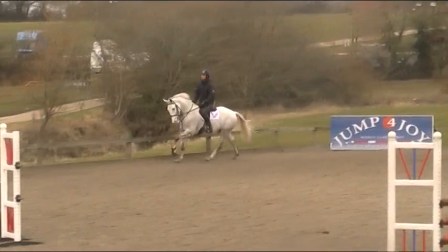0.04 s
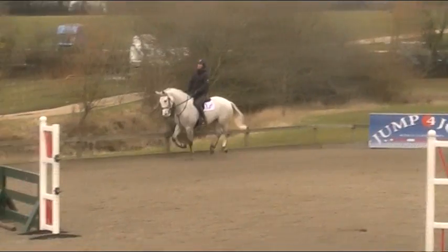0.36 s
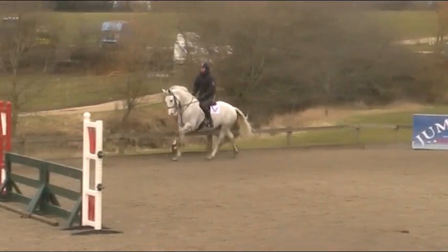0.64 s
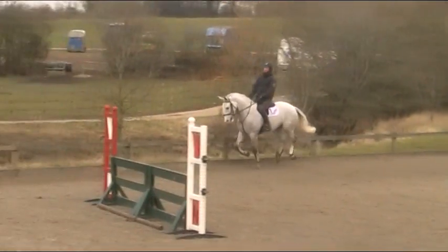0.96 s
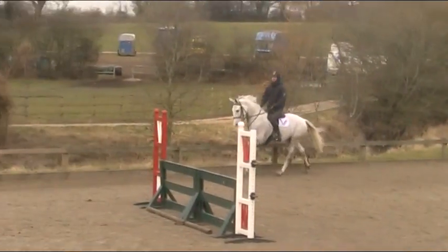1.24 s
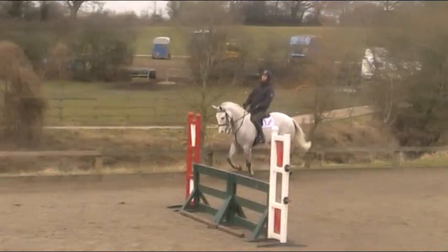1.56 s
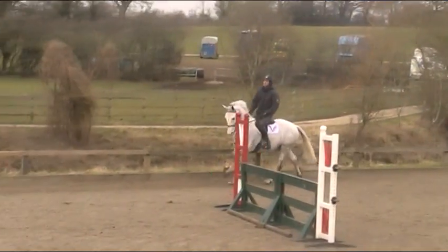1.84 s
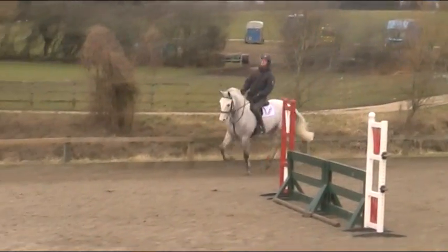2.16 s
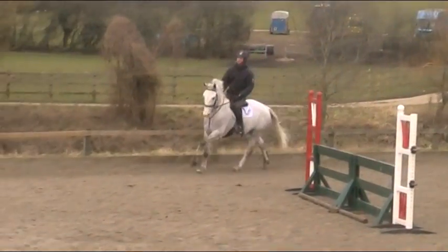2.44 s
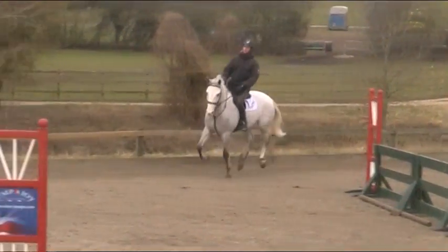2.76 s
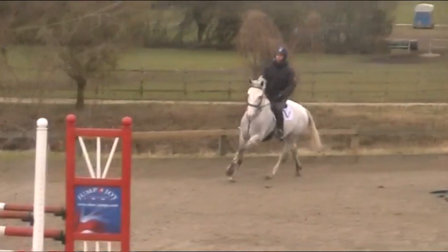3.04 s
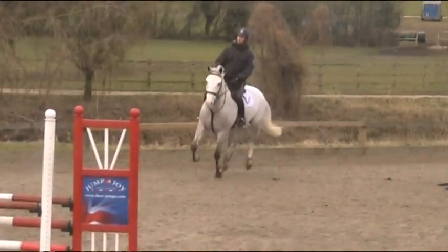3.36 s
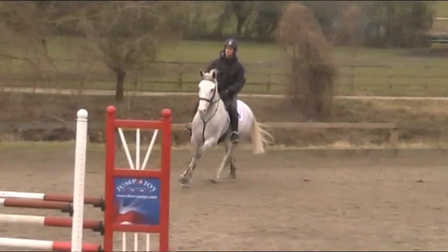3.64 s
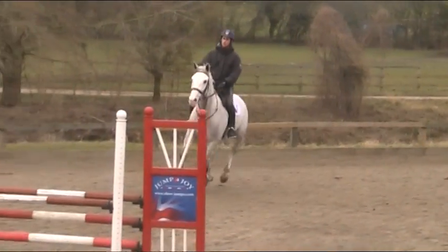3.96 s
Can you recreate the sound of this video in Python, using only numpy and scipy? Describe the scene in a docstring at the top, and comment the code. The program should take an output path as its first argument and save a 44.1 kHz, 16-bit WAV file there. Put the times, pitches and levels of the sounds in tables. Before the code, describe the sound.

Wind rumbles on the microphone, with one sharp plastic click and faint birds.

```python
"""An outdoor arena: a horse canters on soft sand, its hoofs barely heard under a far rush of air and
traffic, and its steel tack clinks once. Wind rumbles on the microphone, an engine hums far off, light
dry ticks come and go, and small birds whistle, echoing in the hedges. The camera's plastic housing
creaks in small ringing clicks as it pans, and once gives a sharp one."""
import sys
import numpy as np
from scipy import signal
from scipy.fft import rfft, irfft, next_fast_len
from scipy.io import wavfile
from scipy.ndimage import map_coordinates

SR = 44100
rng = np.random.default_rng(int(sys.argv[2]) if len(sys.argv) > 2 else 0)


def generate_wav(sig):
    """Save sig (samples, or channels by samples) to the path in sys.argv[1] as 16-bit PCM at SR."""
    pcm = np.round(np.clip(np.atleast_2d(sig).T, -1, 1) * 32767).astype(np.int16)
    wavfile.write(sys.argv[1], SR, pcm)


N = 176400  # 4 seconds


def amp(db):
    """Turn decibels (dB) into a gain."""
    return 10 ** (np.asarray(db) / 20)


def unit(x):
    """Scale a sound to an average power of 1."""
    return x / np.sqrt(np.mean(x ** 2) + 1e-20)


def curve(rows):
    """Join (seconds, value) points with straight lines."""
    return np.interp(np.arange(N) / SR, *np.transpose(rows))


def wobble(rate):
    """A smooth random curve through `rate` points a second."""
    return map_coordinates(rng.standard_normal(int(N * rate / SR) + 4), [np.arange(N) * rate / SR])


def filtered(x, response):
    """Multiply each frequency in x by response(hz)."""
    size = next_fast_len(N + SR // 2)
    return irfft(rfft(x, size) * response(np.fft.rfftfreq(size, 1 / SR)), size)[..., :N]


def noise(colour):
    """Noise of power 1, shaped by (Hz, dB) points."""
    points_hz, db = np.transpose(colour)
    gain = lambda hz: amp(np.interp(np.log(hz + 1), np.log(points_hz), db))
    return unit(filtered(rng.standard_normal(N), gain))


def add(track, start, sound):
    """Mix a sound into a track, `start` seconds in."""
    part = track[..., round(start * SR):][..., :sound.shape[-1]]
    part += sound[..., :part.shape[-1]]


def blows(rows, attack_s, fade_s):
    """Loudness of (seconds, dB) hits: each rises fast, then falls 60 dB in fade_s."""
    out, t = np.zeros(N), np.arange(SR // 4) / SR
    for start, db in rows:
        add(out, start, amp(db - 60 * t / fade_s) * (1 - np.exp(-t / attack_s)))
    return out


def stereo(shared, side):
    """Left and right, from what they share and what differs."""
    return np.array([shared + side, shared - side])


# The rush's colour, shared and side. Each row: frequency in Hz, relative level in dB.
AIR_COLOUR = [(80, -24), (160, -4.5), (230, -4.5), (400, -4), (600, -2.5), (790, 1.5), (1000, -0.5),
              (1250, -5.5), (1550, -12.5), (2000, -18), (2600, -27.5), (3500, -28.5), (5000, -34),
              (7500, -37.5), (10000, -41.5), (15500, -47.5)]
AIR_SIDE_COLOUR = [(100, -24), (300, -14), (600, -16.5), (900, -11), (1400, -18), (2000, -20), (2700, -25),
                   (3500, -27.5), (5000, -31), (8000, -37), (12000, -43), (15500, -48)]
# Its loudness. Each row: time in seconds, relative level in dB.
AIR_LOUDNESS = [(0.1, -41.5), (0.25, -40.5), (1.03, -40), (1.15, -40), (3.55, -40.5), (4.0, -41)]

def air():
    """Far air and traffic blur into a steady rush, much the same left and right."""
    level = amp(curve(AIR_LOUDNESS) + 1 + 0.26 * wobble(9))
    return level * stereo(noise(AIR_COLOUR), amp(-11) * noise(AIR_SIDE_COLOUR))


# Strength of the gusts and swirls. Each row: time in seconds, relative level in dB.
GUST_LOUDNESS = [(0.06, -45.5), (0.19, -48.5), (0.73, -45.5), (0.77, -42), (0.95, -46), (1.1, -38.5),
                 (1.16, -50), (1.21, -34.5), (1.23, -50), (1.31, -33.5), (1.43, -54), (1.45, -36),
                 (1.96, -48.5), (2.07, -31.5), (2.11, -56), (2.21, -34), (2.3, -46), (4.0, -45.5)]
SWIRL_LOUDNESS = [(.05, -48), (.42, -52), (.5, -39), (.62, -43), (.9, -35.5), (.96, -42.5), (1.32, -32),
                  (1.41, -42), (1.5, -28), (1.66, -33), (1.72, -41), (1.9, -39), (2.05, -31), (2.12, -37),
                  (2.22, -27), (2.3, -41.5), (2.44, -29), (2.52, -39), (2.66, -48), (2.75, -36),
                  (2.98, -52), (3.26, -45), (3.6, -54), (3.82, -62), (3.87, -40), (4, -46)]
# Their deep colours. Each row: frequency in Hz, relative level in dB.
GUST_COLOUR = [(15, -24), (30, -17), (55, 0.5), (90, 0.5), (130, -3), (200, -14.5), (300, -27.5),
               (600, -47), (2000, -84)]
SWIRL_COLOUR = [(15, -22), (30, -10), (55, -0.5), (90, 2.5), (130, -7.5), (200, -12), (300, -31),
                (600, -43), (2000, -80)]

def wind():
    """Gusts push on both sides of the microphone; swirls push one and pull the other."""
    push = amp(curve(GUST_LOUDNESS) - 0.5 + 1.2 * wobble(22.1)) * noise(GUST_COLOUR)
    swirl = amp(curve(SWIRL_LOUDNESS) - 2 + 1.8 * wobble(21.8)) * noise(SWIRL_COLOUR)
    return stereo(push, swirl)


# The engine's tones. Each row: pitch in Hz, relative level in dB.
ENGINE_TONES = [(92.5, -49.5), (177.6, -56.5), (355.3, -60)]
# How the hum swells. Each row: time in seconds, level change in dB.
ENGINE_SWELL = [(0, -2), (2.3, -3), (2.8, 0.5), (4, 2)]

def engine():
    """A far engine hums in three low, unsteady tones."""
    tones = np.zeros(N)
    for hz, db in ENGINE_TONES:
        level = amp(db + 1.3 * wobble(6.18))
        pitch = hz * (1 + 0.0118 * wobble(8))
        tones += level * np.sin(2 * np.pi * np.cumsum(pitch) / SR)
    return np.sqrt(2) * amp(curve(ENGINE_SWELL)) * tones


def whistle(length_s, pitches, waver):
    """One fluttering bird note, gliding through three pitches."""
    progress = np.linspace(0, 1, int(length_s * SR))
    flutter = lambda rate: map_coordinates(
        rng.standard_normal(64), [progress * length_s * rate], mode="mirror")
    glide = np.polyval(np.polyfit([0, .5, 1], pitches, 2), progress)
    hz = glide * (1 + waver * flutter(156))
    level = np.sqrt(np.abs(np.sin(np.pi * progress))) * amp(1.84 * flutter(70.4))
    return level * np.sin(2 * np.pi * np.cumsum(hz) / SR)


def hedge_echo(song, fade_s=0.62):
    """Hedges scatter a song into a soft echo, different left and right."""
    t = np.arange(SR // 2) / SR
    tail = rng.standard_normal((2, len(t))) * amp(-60 * t / fade_s)
    return signal.fftconvolve(song[None], tail / np.linalg.norm(tail[0]), axes=1)[:, :N]


# Loudness of the far birds. Each row: time in seconds, level in dB.
TWITTER_LOUDNESS = [(0, -76), (1, -64), (1.6, -62), (2.6, -64), (3.1, -64), (3.5, -59), (4, -61.5)]

def far_birds(count=110, centre_hz=3627):
    """Many far chirps, heard only as a blur of echo."""
    song = np.zeros(N)
    starts = rng.uniform(0, N / SR, count)
    for start, (pitch, glide, size) in zip(starts, rng.standard_normal((count, 3))):
        pitches = centre_hz * np.exp(0.14 * pitch + 0.0996 * glide * np.array([.5, 0, -.5]))
        add(song, start, amp(2.6 * size) * whistle(0.05, pitches, waver=0.0177))
    return amp(curve(TWITTER_LOUDNESS)) * unit(hedge_echo(song))


# The plastic's ringing tones. Each row: pitch in Hz, relative level in dB, fade time in seconds,
# lag of the right side in radians.
PLASTIC_TONES = [(377, -28, 0.048, 0.65), (740, -27, .016, 0.9), (1050, -14.5, 0.015, 0.61),
                 (1270, -14, 0.029, 0.86), (1624, -9.5, .026, 1.4), (1770, -5, .02, 2.73),
                 (2040, -7, 0.016, 2.5), (2390, -16.5, 0.024, 2.16), (2720, -15.5, 0.015, 1.6),
                 (3200, -15.5, 0.0089, 1.44), (4030, -26, 0.019, 0.94), (4540, -25, .015, 0.98),
                 (7150, -21, 0.011, 0.95), (10400, -36, 0.011, 1.5)]
# The main clicks. Each row: start in seconds, relative level in dB, the ring's brightness in dB per kHz.
PLASTIC_CLICKS = [(0.189, -41, 0), (.447, -41, -2), (1.187, -27.5, -2.5), (1.271, -39, -0.5),
                  (1.652, -36, -0.5), (1.668, -39, -0.5), (1.844, -33, 0), (2.674, -28.5, 0),
                  (2.741, -16.5, -1.5), (2.7677, 1, -0.5), (2.771, -8, 0.5), (2.905, -31, -0.5),
                  (3.666, -39, 1), (3.8555, -32, -0.5)]
# The crack in each click. Each row: frequency in Hz, relative level in dB.
CRACK_COLOUR = [(200, -19), (1500, -1.5), (4000, -3), (8000, -20.5), (11000, -13.5), (13000, -27),
                (16000, -34)]

def housing(faint_count=30):
    """Each click is a tiny crack that briefly rings the camera's plastic shell."""
    out, t = np.zeros((2, N)), np.arange(SR // 16) / SR
    faint_clicks = [(rng.uniform(0, N / SR), rng.normal(-46, 3), -1) for _ in range(faint_count)]
    hiss = np.array([noise(CRACK_COLOUR), noise(CRACK_COLOUR)])
    attack_s, crack_fade_s = 0.00016, 0.016
    for start, db, brightness in PLASTIC_CLICKS + faint_clicks:
        ring = np.zeros((2, len(t)))
        for k, (hz, tone_db, fade_s, lag) in enumerate(PLASTIC_TONES):
            level = amp(tone_db + brightness * hz / 1000 - 60 * t / fade_s)
            ring += (-1) ** k * level * np.sin(2 * np.pi * hz * t - np.array([[0], [lag]]))
        cut = rng.integers(N - len(t))
        crack = amp(-14.5 + 2 * brightness - 60 * t / crack_fade_s) * hiss[:, cut:cut + len(t)]
        add(out, start, amp(db) * (ring + crack) * (1 - np.exp(-t / attack_s)))
    return out


# A hoof's thud in sand. Each row: frequency in Hz, relative level in dB.
THUD_COLOUR = [(40, -12), (110, -31), (300, -15), (800, 6), (3000, -47), (9000, -58)]

def hoofs(first_s=0.34, stride_s=0.5, gap_s=0.11, rise_db_per_s=2):
    """Three soft thuds a stride, growing louder as the horse nears."""
    beats = [first_s + stride * stride_s + beat * gap_s for stride in range(7) for beat in range(3)]
    thuds = [(start, -45 + rise_db_per_s * start + rng.normal(0, 1.1)) for start in beats]
    return blows(thuds, attack_s=0.012, fade_s=0.058) * noise(THUD_COLOUR)


# The dry ticks. Each row: start in seconds, relative level in dB, extra grit in dB.
DRY_TICKS = [(.341, -56.5, 5.5), (.43, -53.5, 7), (0.951, -44.5, 1), (1.098, -59, 6), (1.543, -51.5, 2.5),
             (2.105, -43, -2), (2.281, -51.5, 5), (2.705, -45.5, -2), (2.867, -49, 1), (2.905, -43, -7),
             (3.143, -51, 5), (3.29, -33.5, -22), (3.442, -54, 2), (3.853, -42.5, -16)]
# A tick's body and its grit. Each row: frequency in Hz, relative level in dB.
BODY_COLOUR = [(500, -25), (1300, -12), (1800, 3), (2500, 16), (3600, -4), (5000, -13), (9000, -28)]
GRIT_COLOUR = [(2000, -25), (4500, 10), (10000, -3), (15000, -20)]

def ticks(fade_s=0.03):
    """Light ticks from straight ahead, each a duller body plus some bright grit."""
    body = blows([(start, db + 0.5) for start, db, _ in DRY_TICKS], 0.0004, fade_s)
    grit = blows([(start, db + extra - 2) for start, db, extra in DRY_TICKS], 0.00048, fade_s)
    shared, side = [body * noise(BODY_COLOUR) + grit * noise(GRIT_COLOUR) for _ in range(2)]
    return stereo(shared, amp(-10) * side)


# The birds' notes. Each row: start and length in seconds, first, middle and last pitch in Hz,
# relative level in dB.
BIRD_NOTES = [(1.219, 0.094, 4800, 4620, 4400, -58.5), (1.353, 0.069, 4170, 4120, 4000, -60),
              (1.68, 0.085, 4900, 4620, 4400, -54.5), (1.754, 0.055, 5650, 5660, 5400, -60),
              (1.838, 0.05, 5760, 6130, 6100, -57), (1.819, 0.2, 4310, 4254, 4300, -48),
              (1.977, 0.082, 4340, 4326, 4110, -45.5), (2.025, 0.073, 4150, 3850, 3720, -49),
              (2.153, 0.055, 4900, 4630, 4480, -53.5), (2.175, 0.05, 3510, 3310, 3220, -55),
              (2.208, 0.074, 3950, 3990, 3840, -51.5), (2.29, 0.1, 4520, 4490, 4630, -59),
              (2.385, 0.062, 4100, 4130, 4180, -54), (2.59, 0.025, 8340, 8000, 7750, -57),
              (2.633, .13, 8460, 8220, 8170, -53), (2.648, 0.18, 4800, 4670, 4480, -58),
              (2.859, .1, 8120, 8210, 8130, -51.5), (2.89, 0.056, 4200, 4100, 4130, -58),
              (2.98, 0.21, 8400, 8230, 8200, -62), (3.019, 0.063, 8520, 8840, 8630, -56),
              (3.096, 0.081, 8900, 8800, 8720, -53.5), (3.09, .025, 4700, 4900, 5200, -58),
              (3.112, .085, 4190, 3790, 3860, -50), (3.264, 0.043, 3640, 3670, 3300, -49),
              (3.282, 0.047, 3860, 4100, 4350, -50.5), (3.31, 0.033, 3070, 2970, 2870, -51.5),
              (3.34, 0.113, 6120, 5910, 5860, -62), (3.45, 0.033, 3120, 3220, 3430, -44.5),
              (3.491, 0.047, 3180, 2987, 2890, -52.5), (3.55, .028, 4750, 4750, 5200, -54),
              (3.569, 0.099, 4164, 3710, 3750, -47.5), (3.68, 0.08, 5840, 5700, 5770, -62),
              (3.788, 0.12, 5950, 5950, 5800, -61), (3.935, 0.04, 3220, 2890, 3000, -45)]

def near_birds(left_lag_s=0.00005):
    """Thin whistles reach the right side first, trailed by their echo from the hedges."""
    song = np.zeros(N)
    for start, length_s, *pitches, db in BIRD_NOTES:
        add(song, start, amp(db + 1) * whistle(length_s, pitches, waver=0.0049))
    direct = filtered(song, lambda hz: np.exp(1j * np.pi * hz * left_lag_s * np.array([[-1], [1]])))
    return direct + amp(-2) * hedge_echo(song)


# The steel's ringing tones. Each row: pitch in Hz, relative level in dB, fade time in seconds.
STEEL_TONES = [(4870, -2, .05), (6080, -13, .05), (9450, -3, .05), (10200, -5, .04), (12400, -15, .18),
               (14830, -15, .2)]

def tack(start_s=3.786, clink_db=-47):
    """A small steel piece of the horse's gear ticks once and rings briefly."""
    ring, t = np.zeros((2, N)), np.arange(SR // 4) / SR
    for hz, db, fade_s in STEEL_TONES:
        tone = np.sin(2 * np.pi * (hz * t + rng.random((2, 1))))
        add(ring, start_s, amp(clink_db + db - 60 * t / fade_s) * tone)
    tick = blows([(start_s, clink_db + 3)], attack_s=0.001, fade_s=0.044)
    return ring + tick * np.array([noise(GRIT_COLOUR), noise(GRIT_COLOUR)])


def scene():
    """All the sounds add up at the microphone."""
    background = air() + wind() + engine()
    return background + hoofs() + ticks() + tack() + near_birds() + far_birds() + housing()


def record(dry):
    """The sound fades in after a brief silence, with the highest treble cut off."""
    silent_s, fade_in_s, top_hz = 0.0405, 0.0095, 15800
    fade_in = np.clip((np.arange(N) / SR - silent_s) / fade_in_s, 0, 1)
    return filtered(dry * fade_in, lambda hz: hz < top_hz)


dry = scene()
out = record(dry)
generate_wav(out)
```